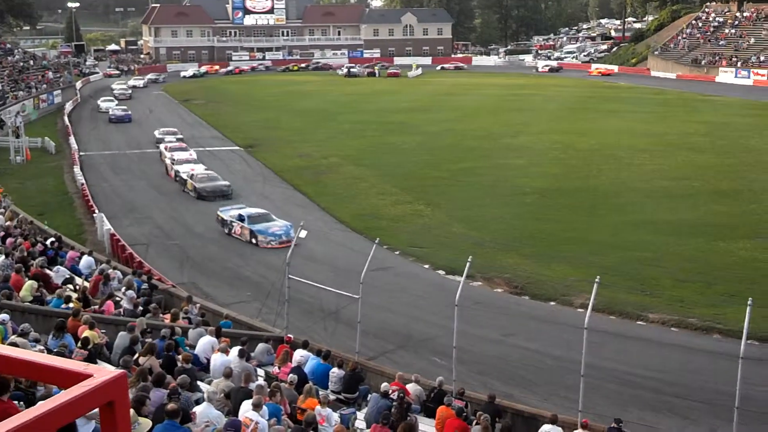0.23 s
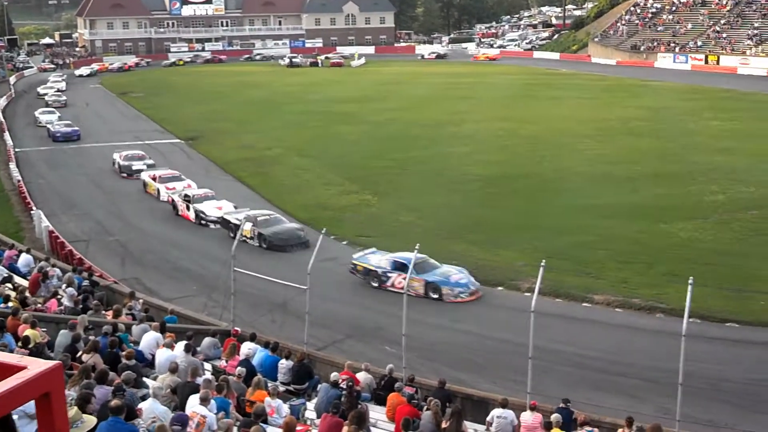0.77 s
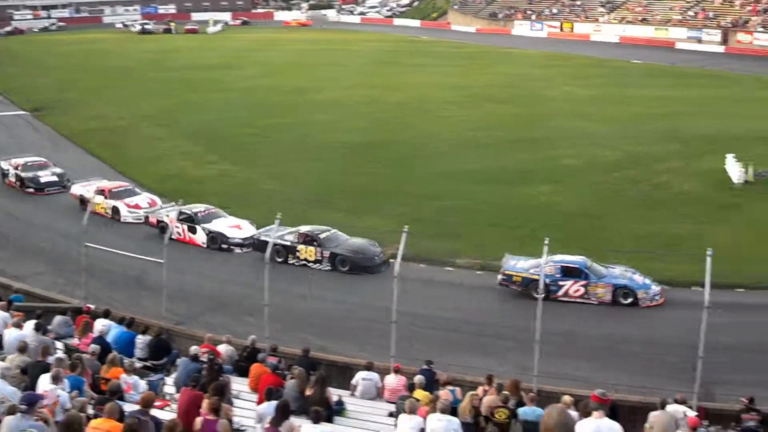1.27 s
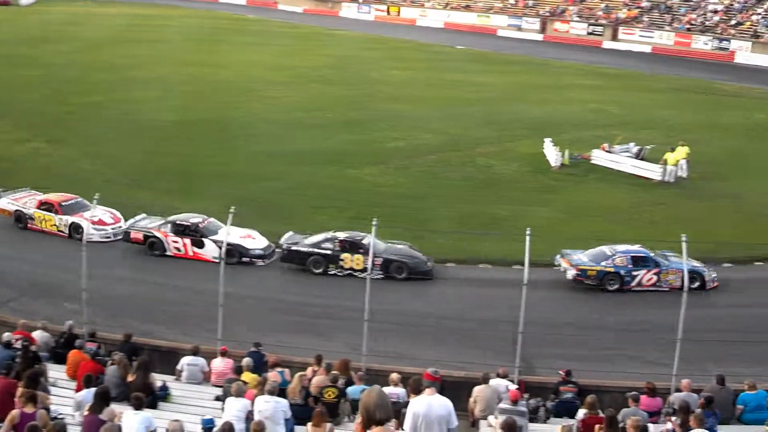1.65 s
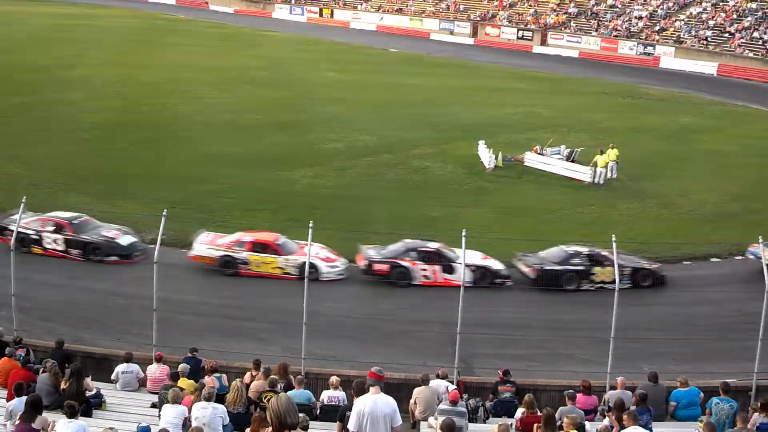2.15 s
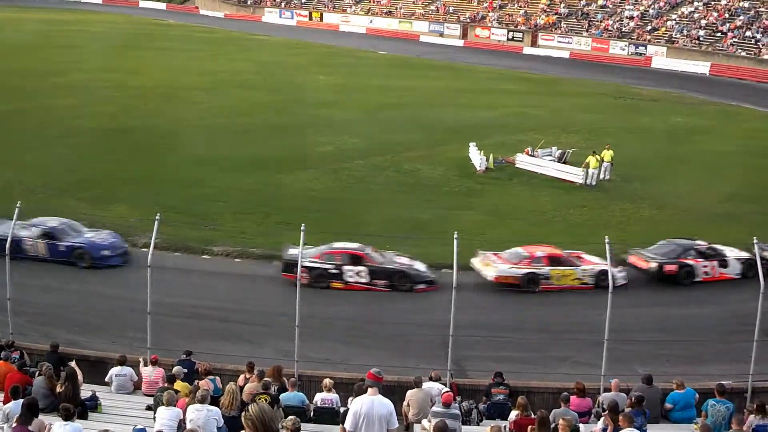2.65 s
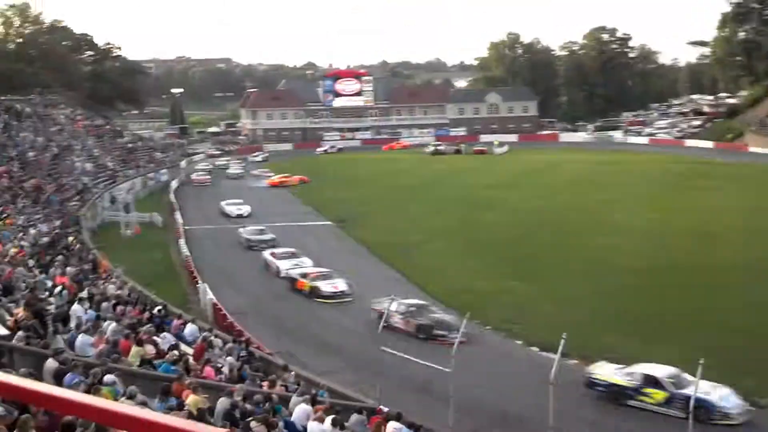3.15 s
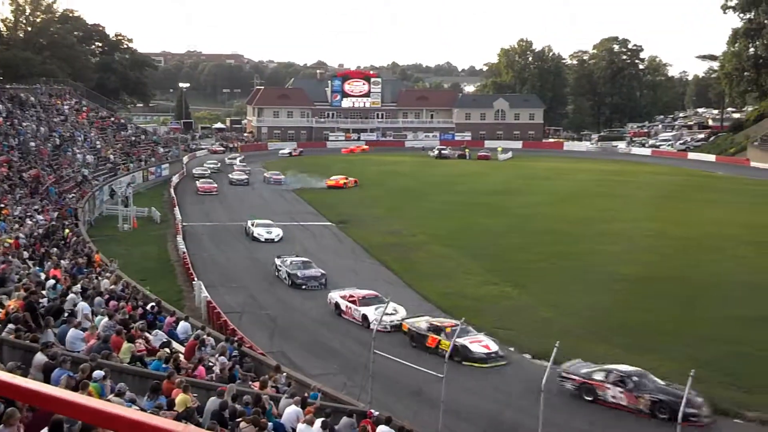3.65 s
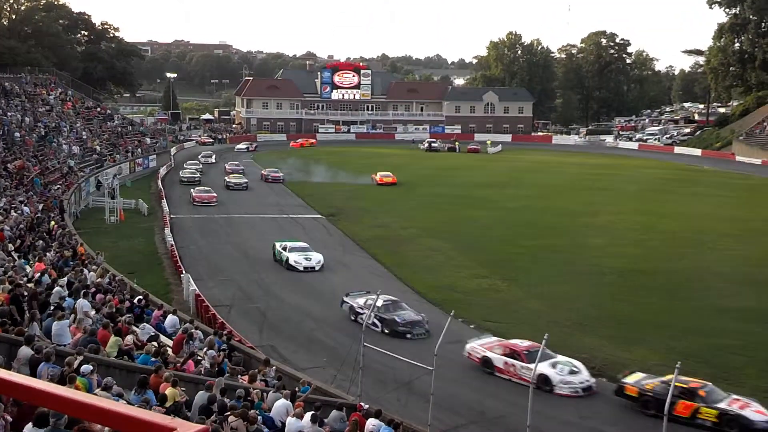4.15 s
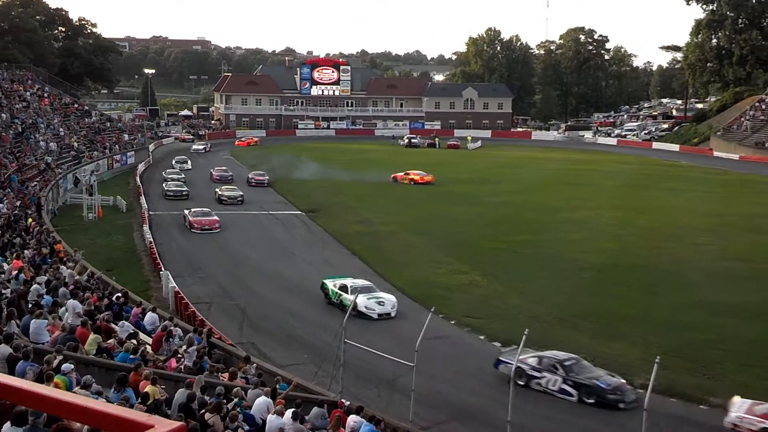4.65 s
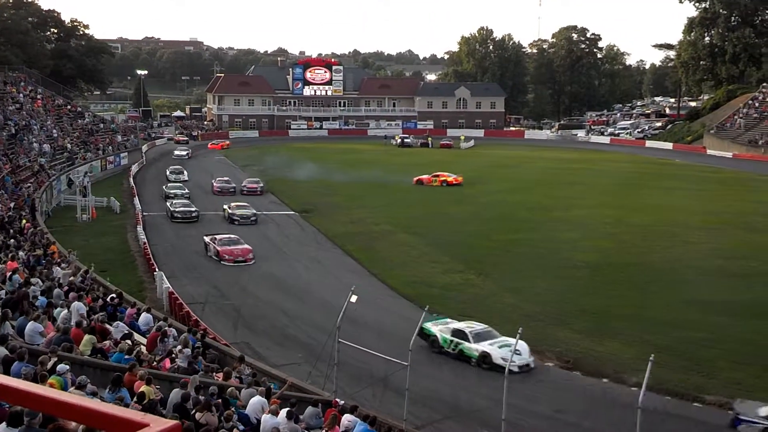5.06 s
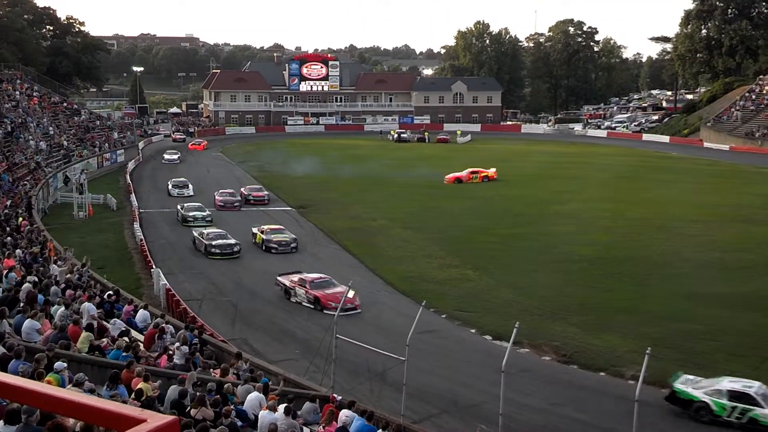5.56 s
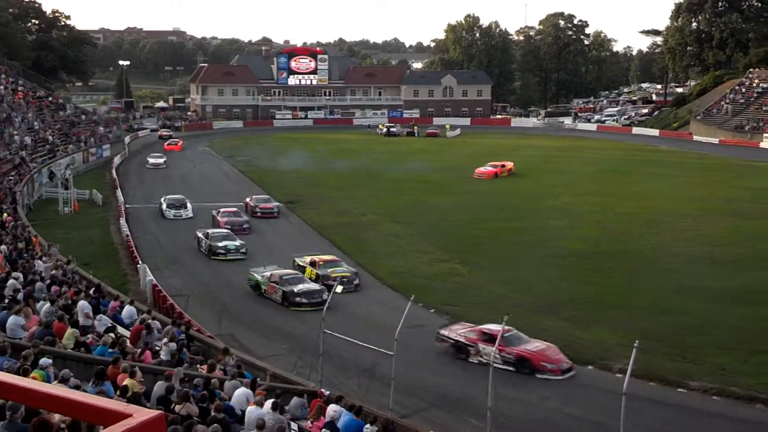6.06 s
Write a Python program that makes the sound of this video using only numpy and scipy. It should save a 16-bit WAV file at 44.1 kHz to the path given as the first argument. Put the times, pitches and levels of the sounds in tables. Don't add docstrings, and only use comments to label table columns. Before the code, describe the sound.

A short oval full of stock cars heard outdoors through a small stereo camera microphone. Overlapping engine howls swell, fall in pitch and fade while others take over. The rest of the pack drones across the track. The second half is louder and raspier, with wind gusts, a short rattle and a slight smear from the stands.

```python
import sys
import numpy as np
from scipy import signal
from scipy.fft import rfft, irfft, next_fast_len
from scipy.io import wavfile
from scipy.ndimage import uniform_filter1d, map_coordinates

SR = 44100
rng = np.random.default_rng(int(sys.argv[2]) if len(sys.argv) > 2 else 0)


def to_wav(sig):
    pcm = np.clip(np.atleast_2d(sig), -1, 1) * 32767
    pcm = np.round(pcm).astype(np.int16)
    wavfile.write(sys.argv[1], SR, pcm.T)


def to_linear_factor(level_db):
    exponent = np.asarray(level_db, float) / 20
    return 10 ** exponent


N = 278359
T = np.arange(N) / SR


def along(points, hz):
    f, v = np.transpose(points)
    return np.interp(np.log(hz + 1), np.log(f + 1), v)


def unit(x):
    return x / np.sqrt(np.mean(x ** 2) + 1e-20)


def wobble(rate, size=N):
    knots = rng.standard_normal(int(size * rate / SR) + 4)
    return map_coordinates(knots, [np.arange(size) * rate / SR])


def filtered(x, response):
    m = next_fast_len(N + 4096)
    spectrum = rfft(x, m) * response(np.fft.rfftfreq(m, 1 / SR))
    return irfft(spectrum, m)[..., :N]


def rush(spectrum, patchy_db):
    z = signal.stft(rng.standard_normal((2, N)), nperseg=512)[2]
    patches = uniform_filter1d(rng.standard_normal(z.shape[1:]), size=8, axis=0)
    patches = uniform_filter1d(patches, size=12, axis=1)
    pair = signal.istft(z * to_linear_factor(patchy_db * unit(patches)), nperseg=512)[1][:, :N]
    return unit(filtered(pair, lambda hz: to_linear_factor(along(spectrum, hz))))


def engine(firing_hz, orders_db, boost_db, flutter_db, rough):
    size = len(firing_hz)
    cam = 2 * np.pi * np.cumsum(firing_hz) / SR / 8 + rough * wobble(30, size=size) / 8
    tone = np.zeros(size)
    for k, db in enumerate(orders_db, 6):
        flutter = to_linear_factor(db + flutter_db * wobble(13, size=size))
        phase = 2 * np.pi * rng.random() + 4 / k * wobble(16, size=size)
        boost = to_linear_factor(boost_db) if k > 9 else 1
        tone += boost * flutter * np.sin(k * cam + phase)
    return np.sqrt(2) * tone, cam


def car(s, firing_rate_hz, level, orders_db, boost_db=np.zeros(N)):
    fade_s = .1
    span = slice(max(round((s[0] - fade_s) * SR), 0), min(round((s[-1] + fade_s) * SR), N))
    t = T[span]
    fade_in = np.clip((t - s[0]) / fade_s + 1, 0, 1)
    fade_out = np.clip((s[-1] - t) / fade_s + 1, 0, 1)
    firing_hz = uniform_filter1d(np.interp(t, s, firing_rate_hz), size=4000)
    tone, cam = engine(firing_hz, orders_db, boost_db[span], flutter_db=2.6, rough=.045)
    puff = (1 + .8 * np.cos(cam)) * np.maximum(np.cos(8 * cam), 0) ** 2
    heard = np.zeros((2, N))
    heard[:, span] = fade_in * fade_out * level[span] * np.array([tone, puff])
    return heard


# time in seconds, firing rate in Hz.
BRAKING = [
    [(0, 368), (.56, 357), (.7, 349), (.84, 331), (1.26, 312), (1.64, 275)],
    [(.6, 397), (1.02, 373), (1.44, 335), (1.76, 327), (2.5, 260)],
    [(1.48, 424), (1.7, 416), (1.96, 388), (2.24, 371), (2.55, 345), (2.9, 320), (3.3, 298), (3.9, 254)],
    [(2.36, 396), (2.5, 402), (3.16, 403)],
    [(2.3, 378), (2.9, 336), (3.12, 323), (3.3, 313), (3.6, 298)],
    [(3.2, 395), (3.7, 353), (3.9, 346), (4.12, 329), (4.55, 305), (4.85, 290), (5.15, 273)],
    [(4.95, 396), (5.1, 380), (5.32, 373), (5.55, 345), (5.72, 340), (5.96, 317), (6.12, 312), (6.31, 294)],
    [(5.6, 424), (5.78, 415), (5.92, 398), (6.31, 372)],
]
# nearest in seconds, firing tone there in dB, time until 40 % farther in
# seconds, tailpipe faces the stands in seconds, boost of the upper orders then in dB.
NEAREST = [
    (.6, -17.5, 0.7, 1.153, 2.5),
    (1.3, -20, 0.26, 1.64, 5.5),
    (2.15, -18.5, 0.33, 1.84, -0.5),
    (3, -24.5, 0.62, 2.9, 3.5),
    (2.9, -22.5, 0.82, 3.1, 1),
    (4.4, -18, 0.53, 4.32, 0),
    (5.75, -18.5, .7, 6.12, 2.5),
    (6.05, -22.5, .3, 5.9, 2.5),
]
PIPE_TURNS_S = [.33, .17, .35, .2, .35, .6, .7, .3]
EXHAUST = ([-17, -14, 0, -14, -12, -16, -22, -22, -22, -26, -22, -26, -25, -28, -28, -27, -28, -30, -30] +
            [-29] * 28)
OWN_PIPES = [{13: -15, 14: -19, 16: -10, 21: -8, 22: -13}, {12: -21, 13: -16, 21: -9}, {12: -15, 16: -15,
             21: -18, 22: -17}, {9: -25, 11: -26}, {12: -22, 15: -13, 17: -9, 21: -11, 23: -17}, {11: -14,
             12: -7, 16: -12, 18: -10, 19: -11, 21: -12}, {13: -13, 14: -15, 18: -9, 21: -7, 22: -14}, {11:
             -16, 16: -18, 17: -17}]


def near_cars():
    pipe_away_db = -18.5
    heard = np.zeros((2, N))
    for curve, passing, own, turns_s in zip(BRAKING, NEAREST, OWN_PIPES, PIPE_TURNS_S):
        s, hz = np.transpose(curve)
        nearest, db, pass_s, faces, boost_db = passing
        level = to_linear_factor(db) / np.sqrt(1 + ((T - nearest) / pass_s) ** 2)
        facing = np.exp(-((T - faces) / turns_s) ** 2)
        orders_db = [own.get(k, shared) for k, shared in enumerate(EXHAUST, 6)]
        heard += car(s, hz, level, orders_db, boost_db + pipe_away_db * (1 - facing))
    return heard


# heard from in seconds, until in seconds, firing rate first in Hz, last in Hz,
# level in dB.
DISTANT = [(0, 0.73, 349, 342.3, -23.5), (0.302, 0.688, 379.5, 364.3, -24),
           (2.401, 2.794, 248, 238.6, -23.5), (4.597, 5.284, 272.4, 303, -28.5),
           (4.649, 5.659, 310, 344.2, -23.5), (5.45, 6.16, 267, 267, -25.5),
           (0.801, 1.609, 259, 287.2, -27.5), (3.299, 4.007, 377.6, 370.7, -27),
           (3.747, 4.343, 322.6, 315.2, -21.5), (5.703, 6.315, 364, 355, -26),
           (3.3, 3.783, 246, 234.2, -23), (4.049, 4.709, 430.4, 404, -27)]


def distant_cars():
    orders_db = [-22, -18, 0, -18, -19, -22, -22]
    heard = np.zeros((2, N))
    for first, last, first_hz, last_hz, db in DISTANT:
        heard += car([first, last], [first_hz, last_hz], to_linear_factor(np.full(N, db)), orders_db)
    return heard


# frequency in Hz, level in dB per Hz.
DRONE = [(60, -120), (130, -13), (175, -8), (240, -5), (330, -4.5), (420, -13.5), (490, -17), (580, -18.5),
         (650, -17), (820, -16.5), (970, -21), (1250, -20.5), (2000, -40), (4000, -120)]


def far_engines(count):
    tones = np.zeros(N)
    for n in range(count):
        lap = (T / 3.9 + (n + rng.random()) / count) % 1
        firing_hz = np.interp(lap, [0, .7, 1], [440, 250, 440]) * (1 + .04 * rng.standard_normal())
        orders_db = 1.5 * rng.standard_normal(20)
        tones += to_linear_factor(3 * wobble(1.5)) * engine(firing_hz, orders_db, 0, flutter_db=3, rough=.06)[0]
    return unit(filtered(tones, lambda hz: to_linear_factor(along(DRONE, hz))))


def field_drone(swell_db):
    drone = to_linear_factor(-9) * rush(DRONE, patchy_db=1.0) + to_linear_factor(-1) * far_engines(count=7)
    return to_linear_factor(-17.5 + 0.37 * swell_db) * drone


# frequency in Hz, level in dB per Hz.
RASP = [(400, -120), (800, 0), (1250, -11), (1500, -3.5), (1750, -3.5), (2000, -2.5), (2400, -6),
        (3000, -8), (4300, -10.5), (6500, -15), (9000, -23), (16000, -44)]


def exhaust_rasp(swell_db, shared_db, gate):
    return to_linear_factor(-29.5 + 0.86 * swell_db + shared_db) * unit(gate * rush(RASP, patchy_db=1.8))


# frequency in Hz, level in dB per Hz.
HISS = [(2000, -120), (4000, -7), (6500, -9), (8600, -6.5), (10000, -3.5), (11500, -2.5), (12700, -5),
        (13800, -2.5), (15000, -1), (16000, -8)]


def tyre_hiss(swell_db, tyres_db, shared_db, gate):
    level_db = -41.5 + 1.03 * swell_db + tyres_db + 1.4 * shared_db + 0.67 * wobble(11.0)
    return to_linear_factor(level_db) * unit(gate * rush(HISS, patchy_db=1.5))


# frequency in Hz, level in dB per Hz.
RUMBLE = [(15, -33), (40, -9), (70, -18), (95, -1), (140, -8), (200, 0.5), (400, -120)]
# time in seconds, level in dB.
WIND = [
    (0, -33),
    (.8, -59.5),
    (2.4, -30.5),
    (2.9, -37),
    (4.3, -33),
    (5.3, -27),
    (6.31, -37),
]


def wind_rumble():
    level_db = np.interp(T, *np.transpose(WIND)) + 1.5 * wobble(8)
    return to_linear_factor(level_db) * rush(RUMBLE, patchy_db=1.5)


def scattered(x):
    t60_s = 0.17
    t = np.arange(SR // 8) / SR
    tails = rng.standard_normal((2, len(t))) * to_linear_factor(-60 * t / t60_s)
    tails = tails / np.linalg.norm(tails, axis=1)[:, None]
    pair = signal.fftconvolve(x[None], tails, axes=1)[:, :N]
    turn = .8 * wobble(3)
    return np.cos(turn) * pair[0] + np.sin(turn) * pair[1]


# heard from in seconds, until in seconds, order's frequency first in Hz,
# last in Hz, level in dB.
GLIMPSES = [(0.16, 0.3, 580, 552, -36), (.3, 0.47, 690, 766, -33.5), (3.1, 3.28, 470, 512, -28.5),
            (3.4, 3.696, 492, 486, -29), (3.5, 3.756, 524, 506.5, -30.5), (3.5, 3.19, 968, 962, -29.5),
            (3.5, 3.878, 930, 780, -36), (4.845, 5.365, 520, 464, -28.5), (5.797, 7.9, 542, 540, -27),
            (4.45, 4.62, 1100, 1000, -31), (5.6, 5.2, 660, 710, -26.5), (2.36, 2.62, 560, 550, -31),
            (2.2, 2.42, 820, 725, -35), (4.15, 4.65, 520, 448, -32), (4.3, 4.25, 895, 888, -30)]


def glimpsed_cars():
    heard = np.zeros((2, N))
    for first, last, first_hz, last_hz, db in GLIMPSES:
        heard += car([first, last], [first_hz, last_hz], to_linear_factor(np.full(N, db)), [-40, -40, 0])
    return heard


# frequency in Hz, level in dB per Hz.
PANEL = [(2800, -120), (3500, -10), (3750, -1), (4300, -1), (4700, -6), (5600, -120)]


def rattle():
    rise_db_per_s, fall_db_per_s = 22, 120
    from_s, until_s = 4.98, 5.36
    cam = 2 * np.pi * np.cumsum(np.interp(T, *np.transpose(BRAKING[5]))) / SR / 8
    bursts = np.exp(.5 * np.cos(cam)) * to_linear_factor(1.5 * wobble(30))
    loss_db = np.maximum(rise_db_per_s * (from_s - T), fall_db_per_s * (T - until_s))
    return to_linear_factor(-31.5 - np.maximum(loss_db, 0)) * unit(bursts * rush(PANEL, patchy_db=1.5))


# frequency in Hz, first over second port in dB,
# likeness 0-1, phase lead in radians.
PORTS = [(100, -1.3, .96, -.04), (230, -1.1, .983, -.1), (310, -1.6, .98, -.15), (350, -3.4, .97, -.18),
         (390, -5.5, .9, -.25), (430, -7.6, .65, -.2), (475, -4.7, .5, -1.2), (525, .6, .5, -1.7),
         (585, 8, .4, -1.6), (660, 6, .75, .5), (740, 3, .92, .1), (820, 0, .92, .05),
         (905, -2.4, .84, -.2), (1000, -4.2, .75, -.7), (1125, -4.3, .5, -1.8), (1275, -2.2, .65, -2.9),
         (1425, 0, .55, -5.9), (1600, -.5, .5, -7.1), (1800, -1, .65, -8.5), (2000, 1.5, .65, -9.8),
         (2250, 3, .3, -10.8), (2800, 1, .3, -11.7), (3500, 3, .25, -15.2), (5000, 2, .2, -15),
         (10000, 0, .2, -15)]


def ports(direct, other, lag_ms):
    hz, tilt_db, alike, lead = np.transpose(PORTS)

    def at(values, f):
        return along(np.transpose([hz, values]), f)

    def blend(f):
        turn = np.arccos(np.clip(at(alike, f), 0, 1)) / 2
        return np.array([np.cos(turn), np.sin(turn)])

    def shading(f):
        shade = to_linear_factor(np.clip(at(tilt_db, f), -9, 9) / 2) * np.exp(-.5j * at(lead, f))
        return np.array([shade, 1 / shade])

    a, b = filtered(np.array([direct, other]), blend)
    first, second = filtered(np.array([a + b, a - b]), shading)
    shift = lag_ms * SR / 2000
    first = map_coordinates(first, [np.arange(N) - shift], order=5)
    second = map_coordinates(second, [np.arange(N) + shift], order=5)
    return np.array([first, second])


# time in seconds, roar in dB, nearness of the tyres in dB.
ROAR = [(0.0, -34, -2), (0.23, -39.5, 0.5), (1.18, -30.5, -2.5), (1.19, -32.5, 0), (1.77, -29.5, -1),
        (1.9, -32.5, 3.5), (2.86, -30, 0.5), (3.22, -24.5, -3.5), (4.41, -25.5, -1), (4.46, -25, 0.5),
        (4.78, -25.5, -1.5), (4.97, -24, -2), (5.28, -27, 0), (5.4, -28.5, -7.5), (5.6, -26.5, -4),
        (5.8, -25.5, -1.5), (6.15, -23, 0), (6.31, -23.5, -6)]
# time in seconds, lag of the first port in milliseconds.
AIM = [
    (0, -.13),
    (2.4, -.08),
    (4.4, -.01),
    (6.31, 0),
]


def scene():
    s, roar, tyres = np.transpose(ROAR)
    roar_db, tyres_db = np.interp(T, s, roar), np.interp(T, s, tyres)
    swell_db = roar_db - roar_db.mean()
    tones, puffs = near_cars() + distant_cars() + glimpsed_cars()
    gate = 1 + .3 * puffs / uniform_filter1d(puffs + 1e-4, size=9000)
    shared_db = 0.84 * wobble(9)
    drone = field_drone(swell_db)
    noises = exhaust_rasp(swell_db, shared_db, gate) + tyre_hiss(swell_db, tyres_db, shared_db, gate)
    noises = noises + wind_rumble() + rattle()
    direct = tones + drone[0]
    late = scattered(direct)
    return ports(direct + noises[0], late + noises[1], np.interp(T, *np.transpose(AIM)))


def top_cut(x):
    return signal.sosfilt(signal.butter(12, 16950, fs=SR, output="sos"), x)


def record(dry):
    widen_samples, top_hz = 16, 15760
    crossed = np.pad(dry[::-1], ((0, 0), (widen_samples, 0)))[:, :N]
    wide = dry - .92 * crossed
    wide = wide / (1 + abs(wide / .9) ** 4) ** (1 / 4)
    wide = filtered(wide, lambda hz: (hz < top_hz) * hz ** 2 / (hz ** 2 + 38 ** 2))
    return top_cut(wide)


dry = scene()
out = record(dry)
to_wav(out)
```